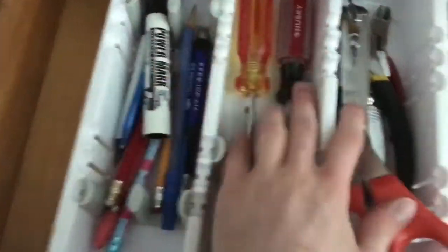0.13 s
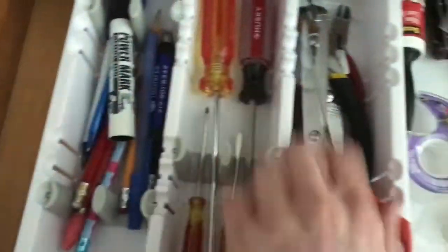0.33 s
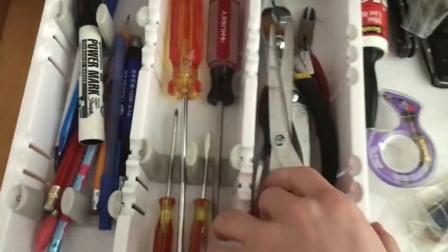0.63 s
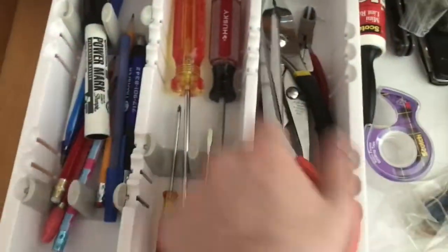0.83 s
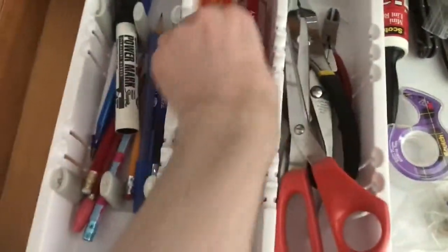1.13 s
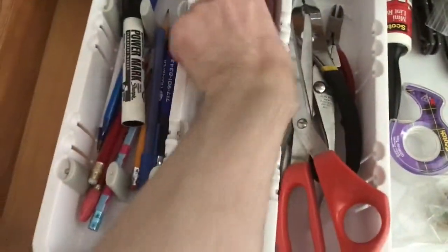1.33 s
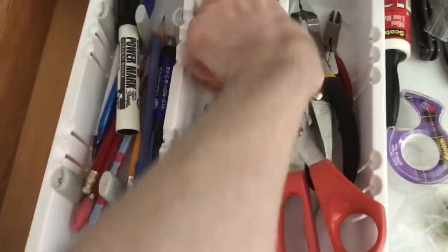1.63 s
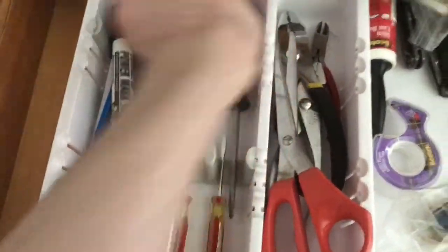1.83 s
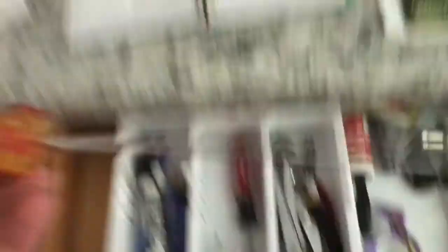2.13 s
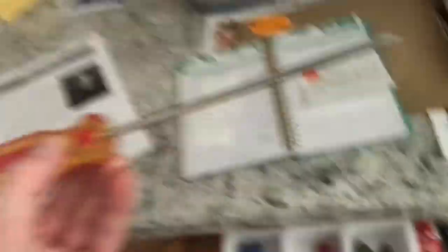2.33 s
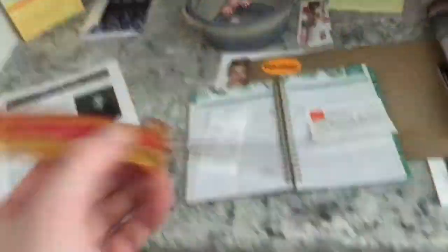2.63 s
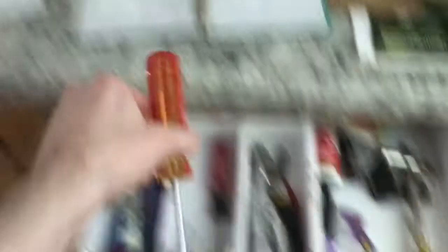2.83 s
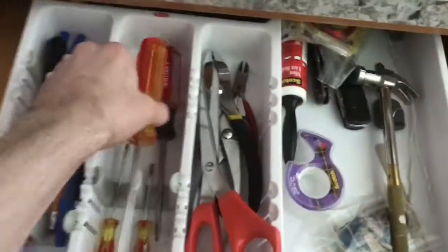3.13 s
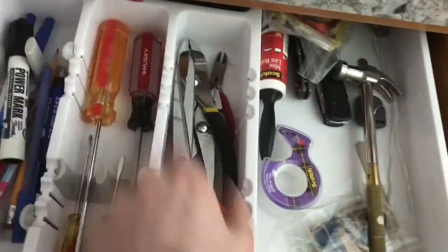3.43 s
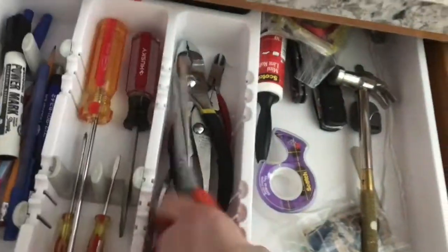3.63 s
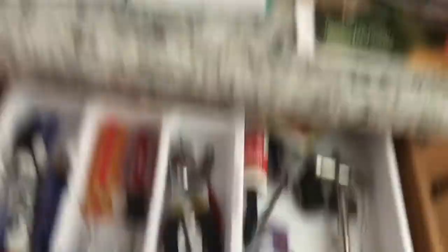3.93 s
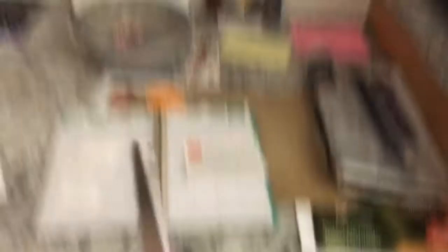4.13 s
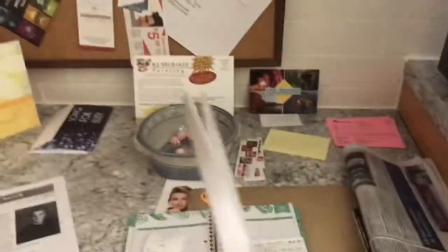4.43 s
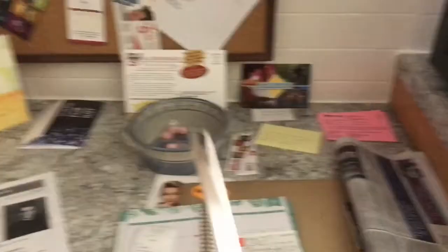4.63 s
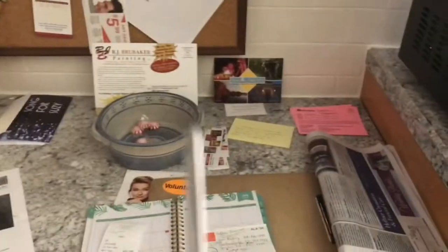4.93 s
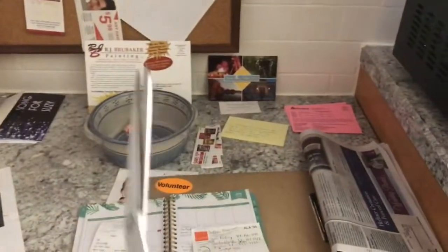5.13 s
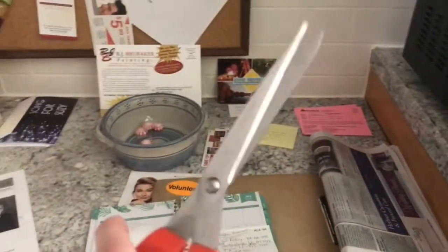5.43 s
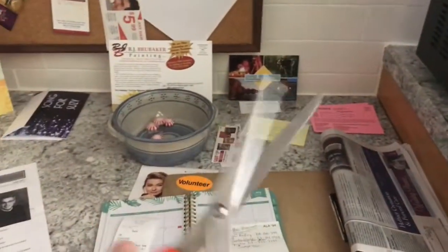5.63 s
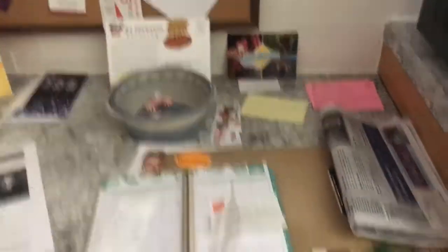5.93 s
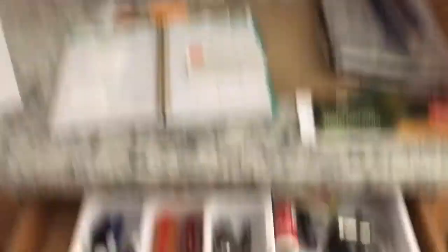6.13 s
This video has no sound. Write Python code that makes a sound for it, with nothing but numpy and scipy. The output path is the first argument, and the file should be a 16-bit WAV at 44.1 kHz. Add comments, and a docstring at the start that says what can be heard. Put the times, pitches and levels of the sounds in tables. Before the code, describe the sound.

Close phone pickup in a small, lightly reverberant kitchen, with a low, slowly beating appliance hum and soft air hiss throughout. From 0.15 s, hard tool handles knock in a plastic tray in small irregular clusters, with faint dull scrapes and a brief metallic ping near 0.5 s. A stronger knock lands at 0.96 s, then sparse faint taps. Clacks resume at 1.57 s and build to the loudest blow at 1.9 s, a double knock that makes the wooden drawer boom. From about 2.1 to 3.05 s it is nearly quiet and duller. At 3.07 s a tool drops back with a scrape, followed by dense clattering from 3.2 to 3.5 s and looser rattles and a thin steel ring until 3.9 s. Quiet hum follows, with tiny metallic ticks at 4.4 and 4.8 s. Scissor blades rasp at 5.55 s and again at 5.73 s, snapping shut crisply at 5.78 s. Hum remains to the end at about 6.3 s.

```python
"""A kitchen with a wooden drawer: a hand rummages among screwdrivers, pliers and pens in a plastic tray.
Knocks are note-plus-noise bursts with rebounds; scrapes are tiny slips; heavy blows ring drawer modes.
Scissor blades ring as decaying partials, slide, and snap shut near the end.
Diffuse echoes and a low beating appliance hum surround it; a phone lowers the treble in pauses."""
import sys
import numpy as np
from scipy import signal
from scipy.fft import rfft, irfft
from scipy.io import wavfile
from scipy.ndimage import uniform_filter1d, minimum_filter1d

SR = 44100
rng = np.random.default_rng(int(sys.argv[2]) if len(sys.argv) > 2 else 0)


def wav_out(sig):
    """Save sig, one row per channel (or a flat mono array), as 16-bit PCM at SR to the path in sys.argv[1]."""
    wavfile.write(sys.argv[1], SR, np.round(np.clip(np.atleast_2d(sig).T, -1, 1) * 32767).astype(np.int16))


N = 277830
TIME = np.arange(N) / SR
HIT = TIME[:SR // 7]  # time axis of one blow
RING_SPREAD_OCT = .3  # scatter of ring pitch between contacts

# tools and fingers dragging in the tray: (time [s], length [s], level [dB], band frequency [Hz])
DRAG_STROKES = [(0.158, 0.072, -40, 890), (.22, 0.087, -52.5, 1200), (0.412, 0.058, -49.5, 1200),
                (0.519, 0.085, -53, 970), (0.779, 0.078, -50.5, 1400), (0.961, 0.11, -46.5, 1940),
                (1.181, 0.3, -58, 960), (1.303, 0.43, -66, 3000), (1.657, 0.16, -50, 940),
                (1.902, 0.04, -31.5, 680), (3.076, 0.062, -33, 264), (3.211, 0.18, -39, 1090),
                (3.389, 0.12, -30.5, 990), (3.491, 0.11, -42, 1210), (3.684, 0.21, -47, 1020)]


def undb(db):
    """Decibels to amplitude ratio."""
    return 10 ** (np.asarray(db) / 20)


def unit(x):
    """Scale to rms 1."""
    return x / np.sqrt(np.mean(x ** 2) + 1e-18)


def fade(t, t60_s):
    """Exponential decay, 60 dB down after t60_s."""
    return np.exp(-np.log(1000) * t / t60_s)


def band(x, low_hz, high_hz, order=3):
    """Causal band-pass, upper edge kept below Nyquist."""
    top_hz = min(max(high_hz, low_hz + 1), SR / 2 - 1000)
    sos = signal.butter(order, [low_hz, top_hz], "band", fs=SR, output="sos")
    return signal.sosfilt(sos, x)


def colour(x, points):
    """Minimum-phase filter through (Hz, dB) points, built by folding the cepstrum."""
    hz, db = np.transpose(points)
    size = 8192
    grid_hz = np.maximum(np.fft.rfftfreq(size, 1 / SR), 1)
    gain = undb(np.interp(np.log(grid_hz), np.log(hz), db))
    cepstrum = irfft(np.log(gain))
    cepstrum[1:size // 2] *= 2
    cepstrum[size // 2 + 1:] = 0
    impulse = irfft(np.exp(rfft(cepstrum)))
    return signal.fftconvolve(x, impulse)[:len(x)]


def add(track, start_s, sound):
    """Mix a sound in at start_s."""
    i = int(start_s * SR)
    track[i:i + len(sound)] += sound[:N - i]


def strength(x):
    """Scale a blow to the energy of 10 ms at rms 1."""
    return x / np.sqrt(np.sum(x ** 2, axis=-1, keepdims=True) / (SR / 100))


def ring(modes, length_s):
    """Sum of decaying sines (Hz, dB, t60 s), each with a chance sign."""
    t = TIME[:int(length_s * SR)]
    out = 0
    for hz, db, t60_s in modes:
        sign = rng.choice([-1, 1])
        out = out + sign * undb(db) * np.sin(2 * np.pi * hz * t) * fade(t, t60_s)
    return out


def friction(length_s, slips_per_s, spread_db):
    """Stick-slip stroke: random uneven impulses that swell and die."""
    n = int(length_s * SR)
    occurs = rng.random(n) < slips_per_s / SR
    slips = occurs * rng.choice([-1, 1], n) * undb(spread_db * rng.standard_normal(n))
    return slips * np.sqrt(np.hanning(n))


def background(hum_hz=58.5, second_hz=68.2, second_db=-12, hum_db=0, air_db=-54):
    """Two low appliance tones beat against each other over steady room air and hiss."""
    # hum level: (time [s], level [dB])
    hum_level = [(0, -42), (1.3, -42.5), (2.7, -46), (4.05, -42.5), (4.2, -52.5), (4.5, -53), (4.68, -45.5),
                 (6.3, -46)]
    # spectrum of room air and microphone hiss: (frequency [Hz], relative level [dB])
    air_spectrum = [(25, -4.5), (42, -1), (75, 10.5), (100, 11.5), (140, 0), (212, 11.5), (280, -0.5),
                    (380, 2), (550, -5.5), (950, -3.5), (2000, -11.5), (4000, -15.5), (9000, -21),
                    (15500, -22)]
    tones = np.sin(2 * np.pi * hum_hz * TIME)
    tones = tones + undb(second_db) * np.sin(2 * np.pi * second_hz * TIME)
    level_db = hum_db + np.interp(TIME, *np.transpose(hum_level))
    hum = np.sqrt(2) * tones * undb(level_db)
    air = unit(colour(rng.standard_normal(N), air_spectrum))
    return hum + undb(air_db) * air


def rebounds(count=3, gap_s=.009, gap_jitter=.25, thud_step_db=3.5, hardness_step_db=-1.5):
    """A struck tool settles in quick rebounds, each duller, with relatively more thud."""
    # tools knocking in the tray; thud and hardness are relative to the level: (time [s], ring [Hz],
    # level [dB], thud [dB], hardness [dB], level change per rebound [dB])
    knock_list = [(.029, 1070, -46.5, -6.5, -3, -18), (.172, 1130, -31.5, -4.5, 3, -20),
                  (.182, 1103, -22, -26, 0, -17.5), (.194, 1630, -22.5, -12.5, -13.5, -16),
                  (.2455, 2290, -45, -6, -4.5, -16), (.271, 1200, -35.5, -12, -19, -16.5),
                  (0.3153, 1960, -33.5, -16.5, -13.5, -14), (0.326, 1084, -35.5, -12, -5, -15),
                  (.427, 1243, -20.5, -16, -6, -8.5), (0.453, 940, -34.5, -6, -10, -13.5),
                  (0.523, 11100, -36, -9, 6.5, -9.5), (0.547, 900, -44.5, 0, 4, -14),
                  (0.609, 2320, -24, -25, -9, -13), (0.6161, 2313, -25, -12, -5.5, -6.5),
                  (0.8083, 2360, -23, -21.5, -8.5, -20.5), (0.8407, 1150, -25.5, -10, -12, -14.5),
                  (.864, 1490, -36, -14, -4.5, -22), (.892, 1155, -24, -10.5, -3, -12),
                  (.943, 2290, -25.5, -14.5, -8, -6), (.962, 1263, -14, -17, -1, -21.5),
                  (1.251, 1210, -46, -8.5, -16, -14), (1.3256, 790, -42.5, -2.5, -14.5, -15.5),
                  (1.4588, 1260, -34, -7.5, -11.5, -13), (1.5653, 1833, -19.5, -18, 0, -3),
                  (1.584, 940, -21.5, -11.5, -5.5, -4.5), (1.682, 1000, -27.5, -12.5, -21.5, -17.5),
                  (1.7886, 1450, -29, -14.5, -12.5, -16), (1.8319, 947, -23.5, -10.5, -16, -13),
                  (1.8649, 1110, -28, -13, -16.5, -16), (1.8976, 1094, -15, -3, -13, -17),
                  (1.902, 1718, -12.5, -15, -34, -13.5), (1.9127, 1790, -12, -8, -13.5, -7),
                  (2.119, 1680, -46, -10, -2.5, -20), (3.07, 710, -28.5, -6, -10, -3.5),
                  (3.114, 750, -33, -12.5, -23, -14), (3.206, 2870, -32.5, -14.5, -5, -15),
                  (3.2154, 1174, -15, -16, -3.5, -8.5), (3.24, 1720, -24.5, -11, -5, -12.5),
                  (3.253, 1665, -26, -9, -1.5, -12), (3.285, 2480, -14, -16.5, -1.5, -20.5),
                  (3.315, 835, -33.5, -5, -18, -9), (3.341, 1240, -18, -10.5, -9.5, -14),
                  (3.363, 1900, -18.5, -16, -17, -16.5), (3.3939, 1390, -16.5, -11.5, -5.5, -5),
                  (3.443, 930, -23, -4.5, -3.5, -6.5), (3.4565, 1210, -16.5, -4, -8.5, -10),
                  (3.4816, 882, -16, -13, -10, -7), (3.506, 830, -35.5, -8, 1, -14),
                  (3.533, 920, -28.5, -8.5, 0.5, -9.5), (3.583, 1737, -31, -9.5, -8, -15),
                  (3.7257, 3030, -27, -12, 8, -21), (3.7576, 910, -24, -10, -6, -16),
                  (3.8193, 1400, -18.5, -8, 1, -21.5), (3.8651, 2650, -33, -5, -6, -14),
                  (3.8955, 938, -27.5, -7.5, -5.5, -17.5)]
    rows = []
    for s, hz, db, thud_db, hard_db, change_db in knock_list:
        rows.append((s, hz, db, thud_db, hard_db))
        for k, (late, detune) in enumerate(rng.standard_normal((count, 2)), 1):
            s = s + gap_s * np.exp(gap_jitter * late)
            rebound_hz = hz * 2 ** (RING_SPREAD_OCT * detune)
            rows.append((s, rebound_hz, db + k * change_db,
                         thud_db + k * thud_step_db, hard_db + k * hardness_step_db))
    return [row for row in rows if row[2] > -60]  # drop the faintest contacts


def knocks(contacts, tone, chatter_db=2.5, direct_db=-2.0, tick_db=-5, tick_per_hardness=1.4):
    """Each contact sounds a note and noise for a crowd of damped modes; the highs die first."""
    # parts of a knock, drawer floor to hard contact: (low [Hz], high [Hz], rise [s], t60 [s])
    parts = [(157.5, 678, 0.0037, 0.053), (760, 2290, 0.00084, .036), (2630, 7060, 0.00046, 0.03),
             (6500, 57000, 0.00025, 0.024)]
    # resonances of the plastic tray: (frequency [Hz], width [Hz], level [dB])
    tray_modes = [(240.8, 82, -11.5), (800, 180, -6.5), (1040, 120, -6), (1920, 270, -18),
                  (4120, 290, -7.5), (5430, 150, -14)]
    s, hz, force_db, thud_db, hard_db = np.transpose(contacts)
    top_db = force_db + tick_db + tick_per_hardness * hard_db
    levels_db = force_db + thud_db, force_db, force_db + hard_db, top_db
    hz = hz[:, None]
    crowd = rng.standard_normal((len(s), len(HIT)))
    # hard things chatter against each other within the blow: stepwise random gain
    grain = SR // 1500
    chatter = undb(chatter_db * rng.standard_normal((len(s), len(HIT) // grain + 1)))
    crowd = unit(crowd * np.repeat(chatter, grain, axis=1)[:, :len(HIT)])
    # lying among other things, the tool loses its note quickly
    note = tone * np.sqrt(hz / 1500) * np.sin(2 * np.pi * hz * HIT) * fade(HIT, .05)
    blows = 0
    for (low_hz, high_hz, rise_s, t60_s), db in zip(parts, levels_db):
        shape = (1 - np.exp(-HIT / rise_s)) * fade(HIT, t60_s)
        part = strength(band((crowd + note) * shape, low_hz, high_hz))
        blows = blows + undb(db)[:, None] * part
    struck = np.zeros(N)
    for start_s, blow in zip(s, blows):
        add(struck, start_s, blow)
    out = undb(direct_db) * struck
    for mode_hz, width_hz, db in tray_modes:
        out = out + undb(db) * band(struck, mode_hz - width_hz / 2, mode_hz + width_hz / 2, order=1)
    return out


def reflections(x, early_db=-13, early_t60_s=0.11):
    """Quick decaying echoes from the drawer walls and the counter, from 3 ms on."""
    echoes = rng.standard_normal(len(HIT)) * fade(HIT, early_t60_s) * (HIT > .003)
    echoes = band(echoes / np.linalg.norm(echoes), 120, 3800, order=1)
    return undb(early_db) * signal.oaconvolve(x, echoes)[:N]


def kitchen(x, build_s=0.0027):
    """Diffuse room tail of decaying noise bands, shortest in the treble."""
    # reverberation bands: (low [Hz], high [Hz], t60 [s], level [dB])
    room_bands = [(99, 460, 0.52, -8), (544, 1400, 0.61, -14), (1620, 3700, 0.81, -15),
                  (3400, 5900, 0.48, -14.5), (6500, 23000, 0.43, -15.5)]
    # sound reaching the room as the arm covers and uncovers the tray: (time [s], level [dB])
    openness = [(.2, -3), (.85, 0), (.96, -1.5), (1.57, 1.5), (1.9, 1.5), (3.3, 3.5), (3.8, 0.5),
                (5.7, 3.5)]
    t = TIME[:SR]
    tail = 0
    for low_hz, high_hz, t60_s, db in room_bands:
        echoes = rng.standard_normal(SR) * fade(t, t60_s) * (1 - np.exp(-t / build_s))
        tail = tail + undb(db) * band(echoes / np.linalg.norm(echoes), low_hz, high_hz)
    escaping = x * undb(np.interp(TIME, *np.transpose(openness)))
    return signal.fftconvolve(escaping, tail)[:N]


def drags(slips_per_s=900, spread_db=2.5, grit_db=-17):
    """Things scrape along the tray: slips filtered to a dull rasp with a little grit on top."""
    out = np.zeros(N)
    for s, length_s, db, hz in DRAG_STROKES:
        slips = friction(length_s, slips_per_s, spread_db)
        rasp = unit(band(slips, hz / 1.1, hz * 1.7, order=2))
        grit = unit(band(slips, 2 * hz, 10 * hz, order=1))
        add(out, s, undb(db) * (rasp + undb(grit_db) * grit))
    return out


def jostles(max_count=12, rate_per_s=30, ring_hz=1230, usual_level_db=-44.5, level_spread_db=2,
            thud_db=-8.5, hardness_db=-8.5, drag_share=0.46):
    """Light chance contacts along every drag, as rebounds() rows; a louder drag jostles harder."""
    rows = []
    usual_drag_db = np.median(np.array(DRAG_STROKES)[:, 2])
    for s, length_s, drag_db, _ in DRAG_STROKES:
        times = np.cumsum(rng.exponential(1 / rate_per_s, max_count))
        for after_s, (detune, force) in zip(times, rng.standard_normal((max_count, 2))):
            if after_s < length_s:
                db = usual_level_db + drag_share * (drag_db - usual_drag_db) + level_spread_db * force
                hz = ring_hz * 2 ** (RING_SPREAD_OCT * detune)
                rows.append((s + after_s, hz, db, thud_db, hardness_db))
    return rows


def drawer(gain_db=-3, lowest_hz=60, corner_at_18_hz=230, doubling_db=4.5):
    """Heavy blows make the wooden box boom; harder ones wake higher modes, deepest bass is cut."""
    # blows that shake the whole drawer: (time [s], relative level [dB])
    bumps = [(.185, -21), (.427, -23.5), (.963, -19), (1.568, -19.5), (1.834, -17), (1.902, -3),
             (1.917, -9), (3.085, -20.5), (3.217, -18.5), (3.344, -16.5), (3.374, -15.5), (3.458, -16.5),
             (3.482, -16.5), (3.766, -18.5), (3.822, -24)]
    # modes of the loaded drawer: (frequency [Hz], relative level [dB], t60 [s])
    box_modes = [(86.4, -13, 0.32), (115, -22.5, .1), (130, -8.5, 0.15), (354.2, -20.5, 0.2),
                 (462.4, -16.5, 0.19), (561, -15.5, 0.25), (587, -16, 0.13), (682, -25, .3),
                 (741, -15.5, 0.18), (816, -18, .2), (1000, -24.5, 0.29), (1080, -15, 0.23),
                 (1208, -23, 0.65), (1292, -28.5, .5), (1370, -25, .25), (1590, -27.5, 0.32),
                 (1660, -29, .23), (1766, -23.5, 0.16), (1920, -26.5, .52), (2100, -29.5, 0.33),
                 (2350, -32.5, 0.49)]
    out = np.zeros(N)
    for s, db in bumps:
        # corner given for a -18 dB blow; doubles every doubling_db
        corner_hz = corner_at_18_hz * 2 ** ((db + 18) / doubling_db)
        modes = []
        for hz, mode_db, t60_s in box_modes:
            loss_db = 10 * np.log10(1 + (hz / corner_hz) ** 2)
            modes.append((hz, mode_db - loss_db, t60_s))
        add(out, s, undb(db + gain_db) * ring(modes, .6))
    return band(out, lowest_hz, 5000, order=2)


def scissors(snap_t60_s=0.025, slips_per_s=2500, spread_db=8, focus_db_per_oct=35,
             ring_db=-10.0, contact_db=-0.5):
    """Steel blades ping as modal partials, sing under sliding friction and click as they close."""
    # blades sliding over each other and shifting in the hand: (time [s], length [s], level [dB])
    shears = [(4.429, .012, -59), (4.804, 0.0093, -51.5), (5.04, .03, -68.5), (5.12, .02, -69),
              (5.325, .02, -63), (5.546, 0.041, -39), (5.572, 0.015, -38), (5.727, 0.015, -38.5),
              (5.752, 0.051, -41.5)]
    # scissors snapping shut: (time [s], level [dB])
    snaps = [(5.7823, -20.5), (5.7865, -15.5), (5.7905, -43)]
    # steel blades set ringing: (time [s], level [dB], favoured frequency [Hz])
    ping_list = [(0.522, -26.5, 2960), (0.525, -28, 6200), (0.547, -33.5, 9000), (3.717, -36, 7070),
                 (3.728, -28.5, 10800), (5.561, -34, 1760), (5.572, -32, 1760), (5.733, -30, 1720)]
    # blade modes, damped by the hand: (frequency [Hz], relative level [dB], t60 [s])
    blade_modes = [(1750, -8.5, 0.05), (2370, -3, .02), (2890, -8.5, 0.13), (3570, 0, .012),
                   (4450, -3.5, .012), (5334, 5, 0.019), (6029, -5, 0.023), (6830, 2, 0.0097),
                   (8220, 7, 0.053), (9400, -9, 0.091), (11200, -8, 0.15), (11870, -0.5, 0.0085),
                   (12000, -2, .012)]
    # colour of steel on steel: (frequency [Hz], relative level [dB])
    steel = [(400, -40.5), (900, -15.5), (1400, -19), (1900, -14), (2400, -0.5), (3300, -8), (4300, -5),
             (5400, -2), (6300, -2), (8300, 2), (9800, -4), (11700, 1), (13500, -4.5), (15500, -8)]
    contact, pings = np.zeros(N), np.zeros(N)
    for s, length_s, db in shears:
        add(contact, s, undb(db) * unit(friction(length_s, slips_per_s, spread_db)))
    for s, db in snaps:
        click = rng.standard_normal(len(HIT)) * fade(HIT, snap_t60_s)
        add(contact, s, undb(db) * strength(click))
    for s, db, favoured_hz in ping_list:
        # the point of contact favours the partials near one frequency
        modes = []
        for hz, mode_db, t60_s in blade_modes:
            away_oct = abs(np.log2(hz / favoured_hz))
            modes.append((hz, mode_db - focus_db_per_oct * away_oct, t60_s))
        add(pings, s, undb(db) * ring(modes, .2))
    # slips and snaps also ring the blades; pressed together, they damp each other
    blades = ring(blade_modes, .2)[:len(HIT)] * fade(HIT, .04)
    singing = signal.oaconvolve(contact, blades / np.linalg.norm(blades))[:N]
    return undb(contact_db) * colour(contact, steel) + undb(ring_db) * singing + pings


def scene():
    """Everything in the drawer and the hand, heard in the kitchen."""
    body = drawer() + drags() + scissors()
    contacts = rebounds() + jostles()
    near = knocks(contacts, tone=0.6) + body
    # the broad tray feeds the room from two independent draws, with less of each tool's note
    room = sum(kitchen(knocks(contacts, tone=0.41) + body) for _ in range(2)) / np.sqrt(2)
    return (near + reflections(near) + room + background())[None]


def suppressor(x, threshold_db=-45, hold_s=0.345, cut_db=-7, split_hz=3500):
    """The treble is turned down once its short-term power has stayed low for hold_s."""
    highpass = signal.butter(1, split_hz, "high", fs=SR, output="sos")
    treble = signal.sosfiltfilt(highpass, x)
    power = uniform_filter1d(treble ** 2, SR // 100)
    quiet = 1. * (power < undb(threshold_db) ** 2)
    hold = int(hold_s * SR)
    held = minimum_filter1d(quiet, hold, origin=(hold - 1) // 2)  # looks back over the hold time
    closed = uniform_filter1d(held, SR // 50)
    return x - closed * (1 - undb(cut_db)) * treble


def record(dry, top_hz=15800):
    """The phone lowers treble in pauses, rounds the highest peaks and cuts above top_hz."""
    rounded = np.tanh(0.79 * suppressor(dry)) / 0.81
    lowpass = signal.ellip(10, .2, 80, top_hz, fs=SR, output="sos")
    return signal.sosfilt(lowpass, rounded)


dry = scene()
out = record(dry)
wav_out(out)
```